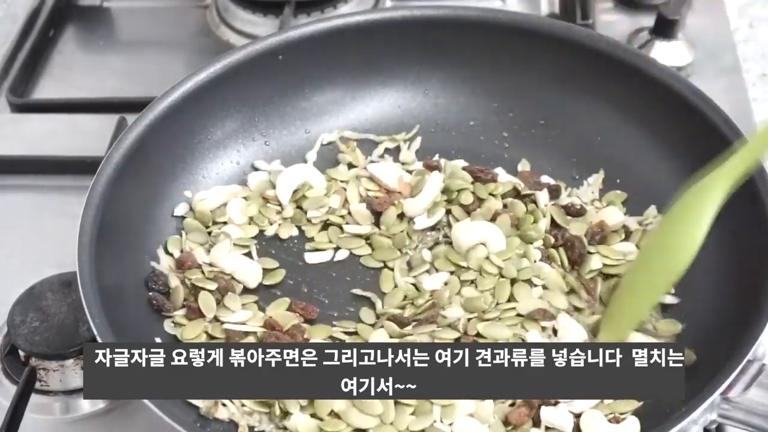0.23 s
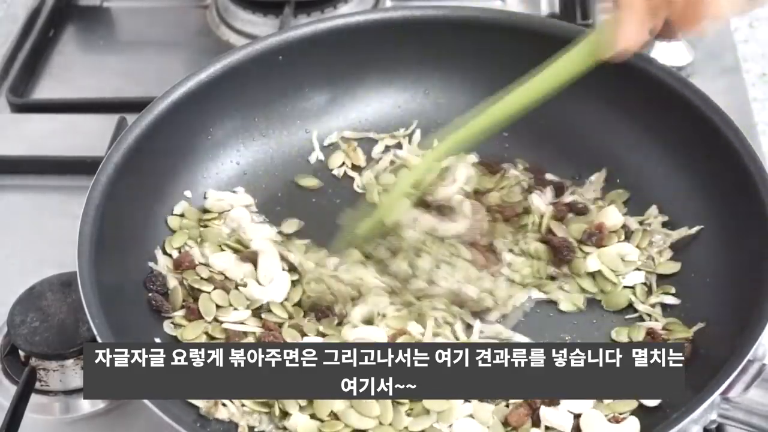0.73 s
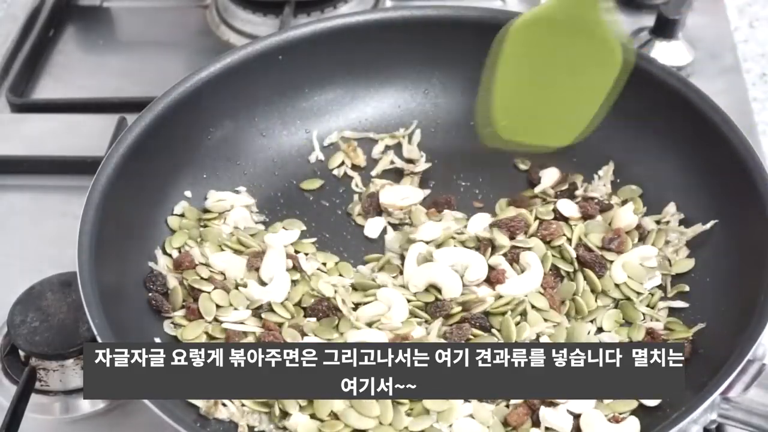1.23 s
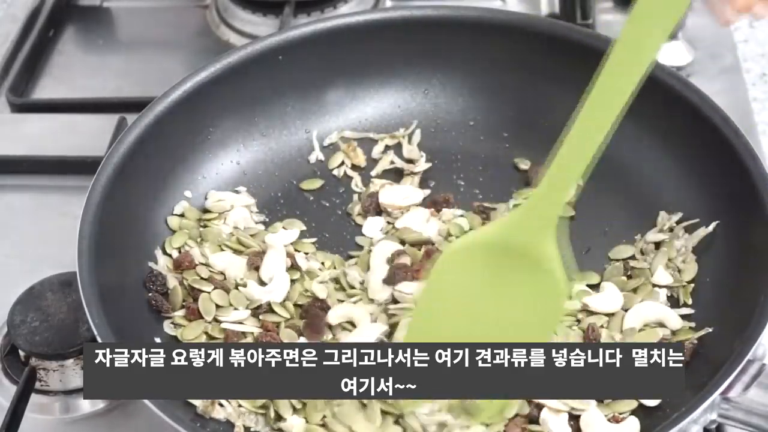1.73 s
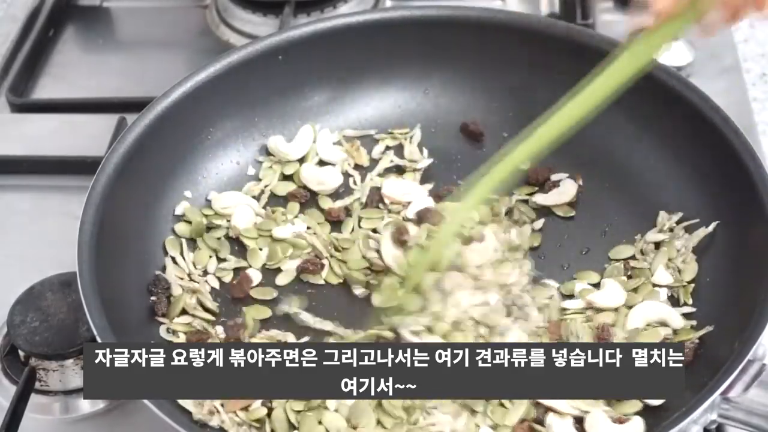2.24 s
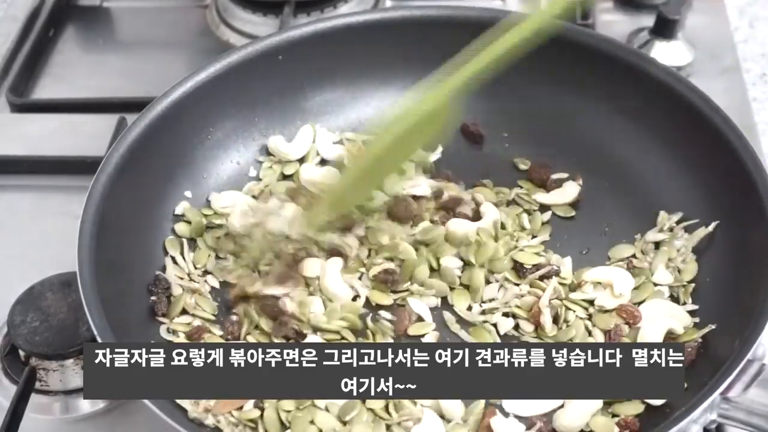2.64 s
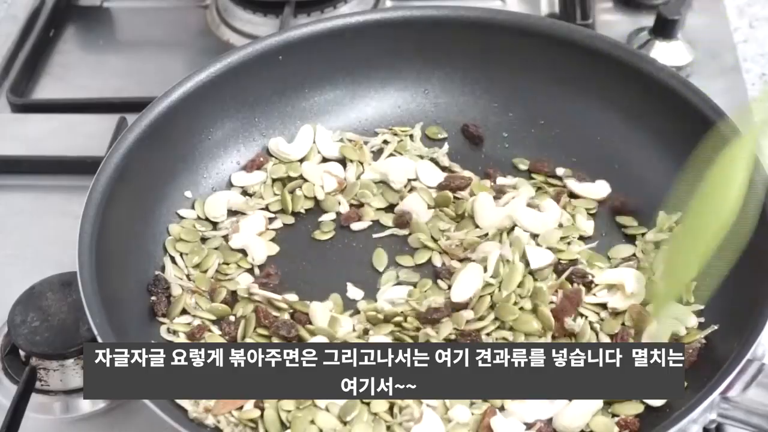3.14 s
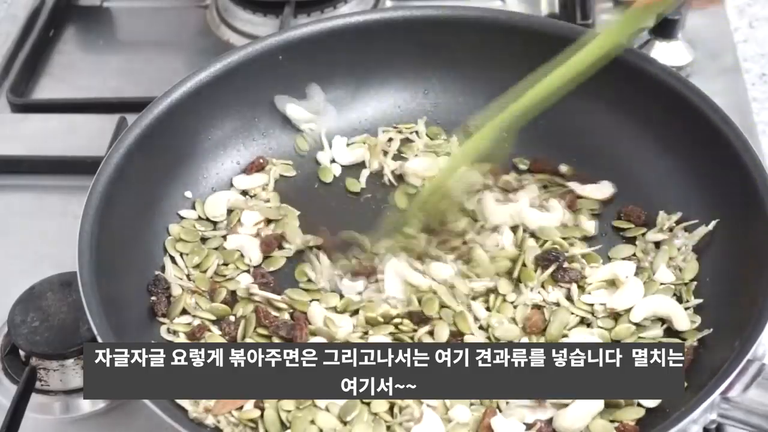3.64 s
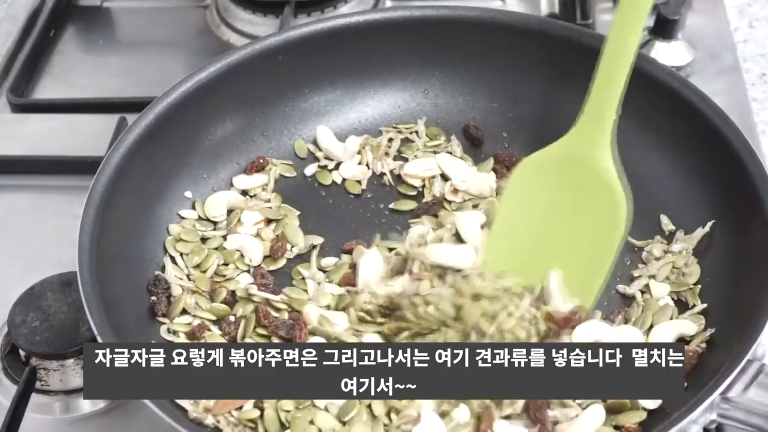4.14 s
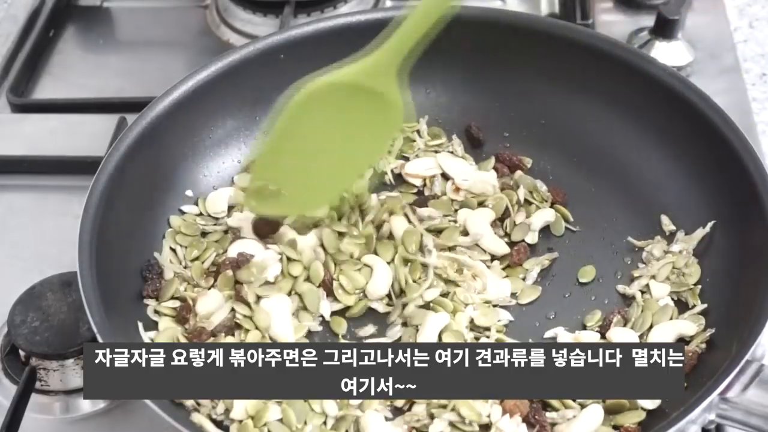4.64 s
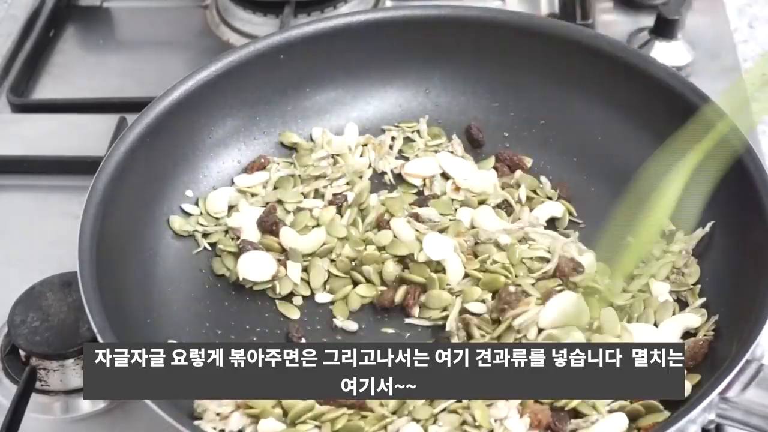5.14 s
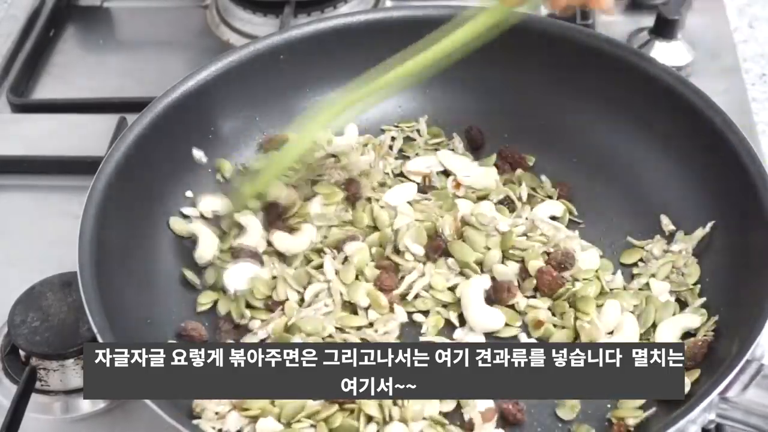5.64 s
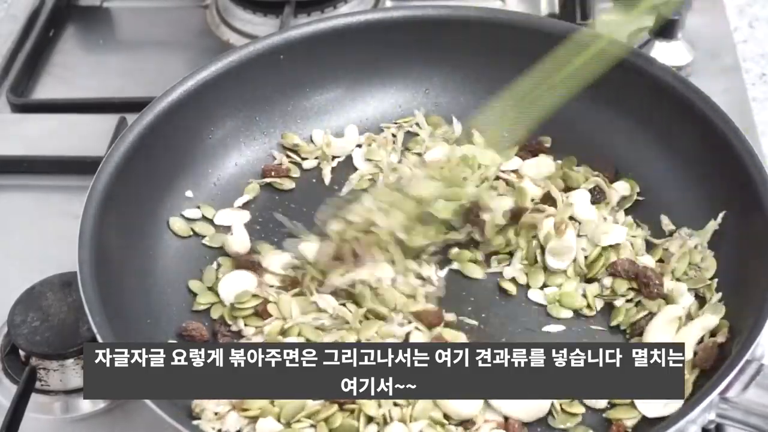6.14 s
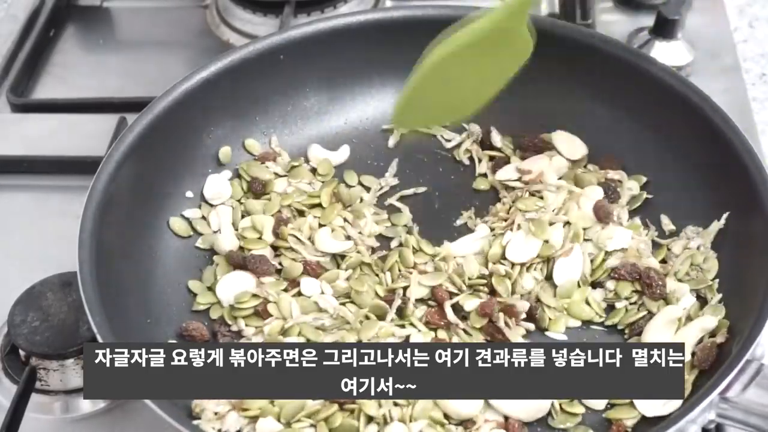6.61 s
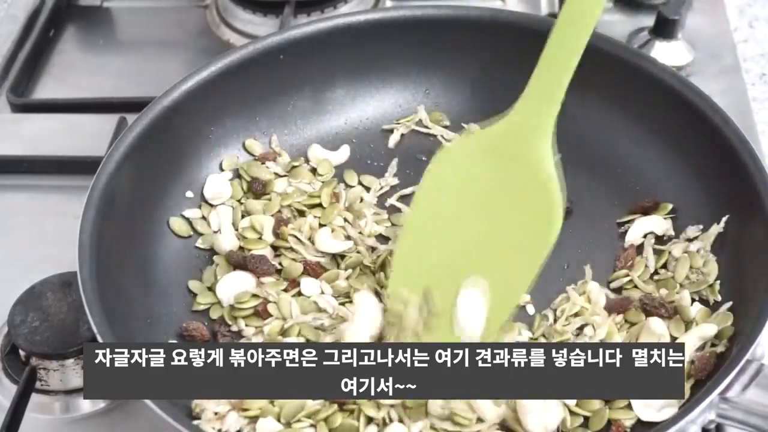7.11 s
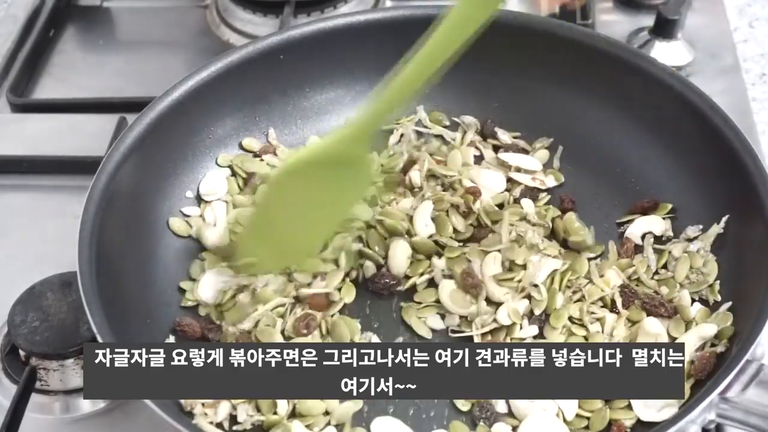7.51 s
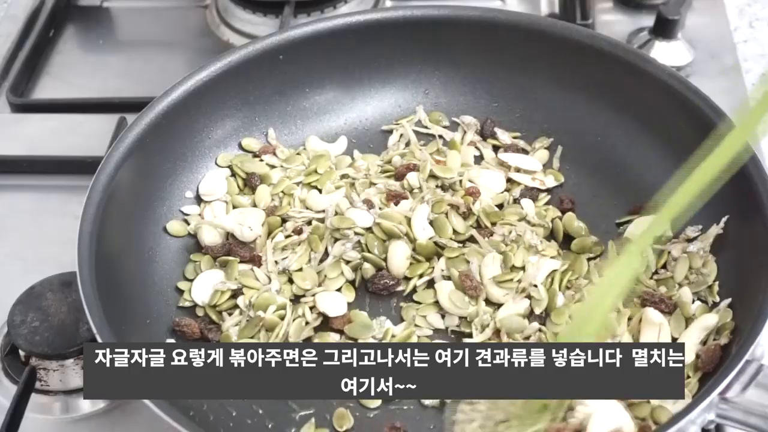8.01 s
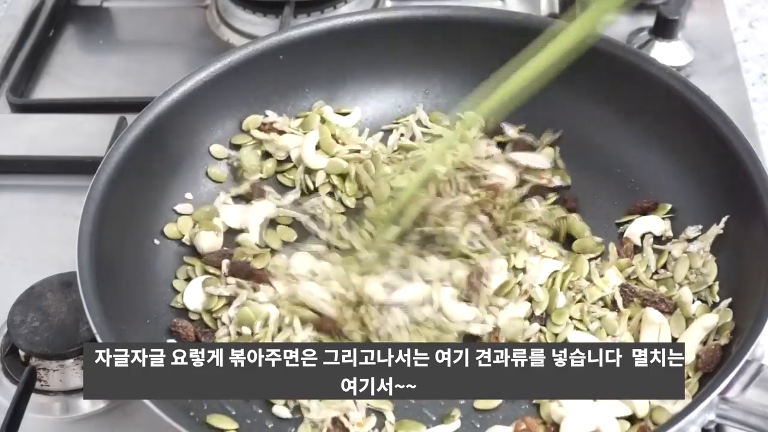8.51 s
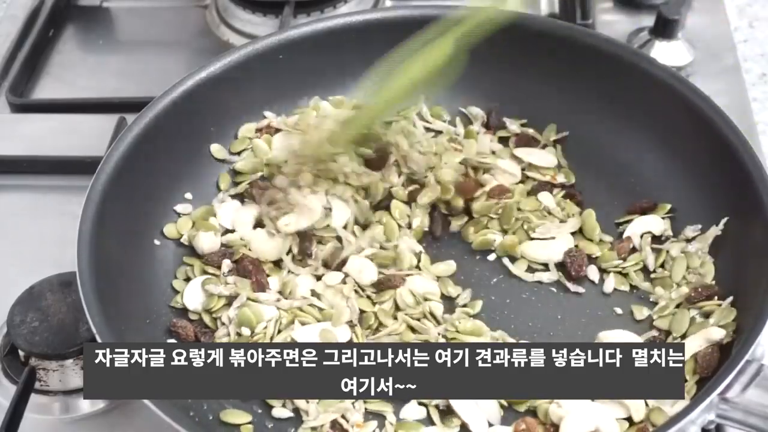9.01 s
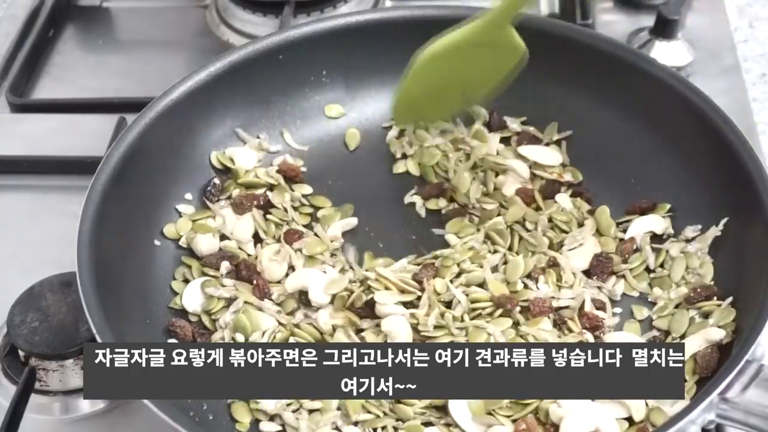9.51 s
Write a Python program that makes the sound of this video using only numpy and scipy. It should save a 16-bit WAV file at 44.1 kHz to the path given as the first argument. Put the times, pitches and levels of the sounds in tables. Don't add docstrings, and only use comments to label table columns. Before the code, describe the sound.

Grainy swishes come in quick uneven strokes as seeds and nuts are turned in a metal pan. They start dense and crackly, ease into lighter stirring, then grow more clattery after six seconds with stronger knocks and scrapes. Short chinks, dry snaps and oil pops scatter over quiet sizzle. Heard very close, with little room echo.

```python
import sys
import numpy as np
from scipy import signal
from scipy.fft import rfft, irfft, next_fast_len
from scipy.io import wavfile
from scipy.ndimage import uniform_filter1d

SR = 44100
rng = np.random.default_rng(int(sys.argv[2]) if len(sys.argv) > 2 else 0)


def boost(x):
    u = np.asarray(x, float) / 20
    return 10 ** u


def file_out(sig):
    cols = np.atleast_2d(sig).T
    lim = np.clip(cols, -1, 1)
    pcm = np.round(lim * 32767).astype(np.int16)
    wavfile.write(sys.argv[1], SR, pcm)


N = 430416


def rms_one(x):
    return x / np.sqrt(np.mean(x ** 2) + 1e-20)


def at_hz(points, hz):
    point_hz, point_db = np.array(points).T
    return np.interp(np.log(hz), np.log(point_hz), point_db)


def bandpass(x, order, low_hz, high_hz):
    return signal.sosfilt(signal.butter(order, [low_hz, high_hz], "band", fs=SR, output="sos"), x)


def lowpass(x, order, hz):
    return signal.sosfilt(signal.butter(order, hz, fs=SR, output="sos"), x)


def highpass(x, order, hz):
    return signal.sosfilt(signal.butter(order, hz, "high", fs=SR, output="sos"), x)


def drift(depth_db, rate_hz):
    r = np.exp(-80 * np.pi * rate_hz / SR)
    slow = signal.lfilter([1], [1, -2 * r, r * r], rng.standard_normal(N // 40 + 2002))[2000:]
    return np.repeat(boost(depth_db * rms_one(slow)), 40)[:N]


def ring(clicks, hz, t60_s, order=1):
    r, w = boost(-60 / (t60_s * SR)), 2 * np.pi * min(hz / SR, .45)
    resonator = [0, np.sin(w), 0, 1, -2 * r * np.cos(w), r * r]
    return signal.sosfilt([resonator] * order, clicks + 1e-18)


# f/Hz, side minus mid level/dB
WIDTH = [(60, -14), (150, -13), (380, -13), (950, -22), (2380, -7.5), (5980, -8.5), (9000, -5.5),
         (15000, -1)]


def stereo(mid, side, hz):
    return mid + boost(at_hz(WIDTH, hz)) * side * [[1], [-1]]


def grains(per_s, spread_db, clump_db):
    sizes = boost(spread_db * np.minimum(rng.exponential(1, N), 5)) * rng.choice([-1, 1], N)
    return sizes * (rng.random(N) < per_s * drift(clump_db, 25) / SR)


def hiss(spectrum, patchy_db):
    out, white = 0, rng.standard_normal((2, 2, N))
    edges = np.geomspace(spectrum[0][0], spectrum[-1][0], 11)
    for k, (low, high) in enumerate(zip(edges, edges[1:])):
        mid, side = bandpass(white[k % 2], 2, low, high)
        hz = np.sqrt(low * high)
        flicker = drift(patchy_db * min(1, 4000 / hz), 10.7)
        out = out + boost(at_hz(spectrum, hz)) * flicker * stereo(mid, side, hz)
    return rms_one(out)


def struck(modes, train, blows, offset_db, scatter_db, wander_db, above_db=0, below_db=5.9):
    s, peak_db, upper_db, contact_hz = np.array(blows).T
    at, luck = (s * SR).astype(int), rng.standard_normal((len(s), len(modes)))
    rub, hits, spots = 0, 0, rng.standard_normal(N)
    for k, (hz, level_db, t60_s) in enumerate(modes):
        rub = rub + boost(level_db) * drift(wander_db, 5) * ring(train * np.roll(spots, 997 * k), hz, t60_s)
        colour_db = upper_db + 6 if hz > 2400 else 0
        colour_db = colour_db - below_db * np.maximum(np.log2(contact_hz / hz), 0)
        colour_db = colour_db - above_db * np.maximum(np.log2(hz / contact_hz), 0)
        hit_db = peak_db + offset_db + level_db + colour_db + scatter_db * luck[:, k]
        clicks = np.zeros(N)
        clicks[at] = boost(hit_db) * np.sign(luck[:, k - 1])
        hits = hits + ring(clicks, hz, t60_s)
    return rms_one(rub), hits


def swells(moves, rest_db):
    t = np.arange(0, N, 40) / SR
    shapes = [np.interp(t, [s - rise_s, s, s + fall_s], [rest_db, db, rest_db])
              for s, db, rise_s, fall_s in moves]
    return np.interp(np.arange(N) / SR, t, np.max(shapes, axis=0))


# peak t/s, rustle level/dB, rattle level/dB, build/s, slide back/s
SWEEPS = [(.08, -28, -32.5, 0.31, 0.67), (.3, -26.5, -54, 0.31, 0.54), (.45, -31, -37, 0.8, 0.1),
          (.76, -36, -43.5, 0.065, 0.49), (1.095, -36.5, -43.5, 0.033, 0.32),
          (1.55, -38.5, -43, 0.15, 0.22), (2.06, -30.5, -42, 0.022, 0.17), (2.28, -36, -45, 0.53, 0.26),
          (2.68, -34.5, -43, 0.42, 0.37), (3.0, -37.5, -39.5, 0.36, 0.3), (3.72, -35, -40.5, 0.35, 0.2),
          (4.72, -44, -46, 0.83, 0.12), (5.05, -38, -43, 0.28, 0.4), (5.42, -38, -40.5, 0.22, 0.21),
          (5.83, -38.5, -35, 0.22, 0.21), (6.13, -39, -42, 0.22, 0.8), (6.28, -40.5, -40, 0.17, 0.21),
          (7.01, -53.5, -42.5, 0.19, 0.25), (7.47, -36, -36.5, 0.14, 0.25), (7.88, -33, -43, 0.15, 0.23),
          (8.21, -33, -38.5, 0.23, 0.21), (8.58, -43.5, -40, 0.27, 0.51), (9.02, -37, -40, 0.33, 0.35),
          (9.39, -34, -35.5, 0.19, 0.32)]
# peak t/s, rustle level/dB, rattle level/dB, half length/s
SPILLS = [(0.221, -26, -27, 0.06), (0.547, -29.5, -46, 0.094), (1.462, -37.5, -55, 0.17),
          (1.782, -36.5, -53, 0.12), (1.92, -38, -51.5, 0.12), (3.309, -36.5, -45.5, 0.16),
          (3.446, -30.5, -39.5, 0.1), (3.94, -39.5, -67, 0.12), (4.18, -38, -44.5, 0.11),
          (4.496, -37, -40, 0.03), (4.914, -39.5, -60, 0.098), (5.207, -37.5, -40, 0.041),
          (5.6, -41, -48, 0.37), (6.482, -40, -33, 0.25), (6.808, -34, -30, 0.027),
          (7.733, -49, -39, 0.051), (8.45, -42.5, -44, 0.2), (8.539, -30.5, -43.5, 0.1),
          (9.257, -34.5, -31.5, 0.056), (9.76, -39, -39.5, 0.18)]
# t/s, drag level/dB, dying away/s
LANDINGS = [(0.0, -30, 0.066), (.22, -30.5, 0.2), (0.75, -31.5, 0.08), (1.42, -37, 0.1), (2.24, -38, 0.1),
            (2.54, -46.5, 0.13), (2.92, -32.5, 0.13), (3.27, -41, 0.12), (3.64, -39, 0.21),
            (4.02, -39, 0.058), (4.52, -42, 0.24), (4.892, -34, 0.15), (5.33, -46.5, 0.33),
            (5.73, -33.5, 0.099), (6.08, -42, 0.21), (6.449, -23.5, 0.19), (6.81, -26.5, 0.18),
            (7.37, -35.5, 0.1), (7.713, -31.5, 0.22), (8.1, -44.5, 0.25), (8.48, -30.5, 0.14),
            (8.89, -32.5, 0.15), (9.257, -27.5, 0.26), (9.631, -26.5, 0.15)]


def stirring():
    heap = list(SWEEPS) + [(s, a, b, half_s, half_s) for s, a, b, half_s in SPILLS]
    lands = [(s, db, 0.054, fall_s) for s, db, fall_s in LANDINGS]
    shaken = [(s, db - 9.5, rise_s, fall_s) for s, db, rise_s, fall_s in lands]
    rustle_db = swells([(s, db, up, down) for s, db, _, up, down in heap], -53)
    rattle_db = swells([(s, db, up, down) for s, _, db, up, down in heap] + shaken, -62)
    return rustle_db, rattle_db, swells(lands, -58)


# f/Hz, level/dB per Hz
RUSTLE = [(1180, -19), (2000, -29), (2310, 0.5), (2560, 6), (2660, -8.5), (5900, 2), (8580, -1.5),
          (12500, -29), (16200, -9), (22000, -120)]


def crackle(clicks):
    count, cycles = 12, 5.5
    out, dealt, spot = 0, rng.integers(0, count, N), rng.standard_normal(N)
    for k, hz in enumerate(np.geomspace(RUSTLE[0][0], RUSTLE[-1][0], count)):
        mine = clicks * (dealt == k) * drift(1.0, 4.8)
        mid, side = ring(np.array([mine, mine * spot]), hz, cycles / hz, order=2)
        gain = boost(at_hz(RUSTLE, hz)) * np.sqrt(hz) / np.sqrt(np.mean(mid ** 2))
        out = out + gain * stereo(mid, side, hz)
    return rms_one(out)


def clacks(busy):
    hits = np.abs(grains(200 * busy, 3.8, 3.0)) + 1e-18
    burst = signal.lfilter([1], [1, -boost(-60 / (0.014 * SR))], hits)
    mid, side = bandpass(burst * rng.standard_normal((2, N)), 2, 1900, 7500)
    return rms_one(stereo(mid, side, 6000))


def heap_rustle(rustle_db):
    busy = boost(0.55 * (rustle_db - np.mean(rustle_db)))
    fine = crackle(grains(3000 * busy, 2.5, 3.0) / np.sqrt(busy))
    return boost(rustle_db - 2.2) * fine + boost(rustle_db - 6.5) * clacks(busy)


# t/s, peak level/dB, contact f/Hz
NUTS = [(0.323, -27, 1900), (0.741, -20, 1230), (1.097, -24.5, 2600), (1.404, -25, 1630),
        (2.0205, -15.5, 1850), (2.058, -17.5, 1860), (2.478, -33, 1930), (2.508, -33, 2270),
        (3.418, -31, 1310), (3.43, -17, 2000), (3.913, -22, 1960), (4, -23, 1720), (4.174, -28, 2120),
        (4.222, -30, 990), (4.893, -26, 1710), (5.177, -29.5, 2260), (5.55, -29.5, 770), (6.438, -12, 980),
        (6.798, -15, 1040), (7.13, -27, 970), (7.227, -22, 1100), (7.267, -21, 1160), (7.855, -27, 2410),
        (9.25, -15, 1000), (9.354, -26.5, 990), (9.41, -22, 1900), (9.591, -29, 1960), (9.622, -15.5, 1070)]
# t/s, peak level/dB, contact f/Hz
TAPS = [(0.167, -11, 1290), (0.202, -12, 1320), (2.019, -15.5, 1390), (2.042, -19.5, 1290),
        (2.081, -21.5, 1910), (2.893, -29, 1760), (2.916, -25, 1030), (3.592, -26.5, 1030),
        (3.714, -25.5, 1340), (4.871, -32, 1740), (5.689, -31, 1140), (6.384, -29, 1230),
        (6.417, -17.5, 960), (6.777, -28, 940), (7.012, -28, 1110), (7.204, -28.5, 905),
        (7.703, -20.5, 1130), (7.766, -28, 1700), (8.394, -28, 1120), (8.461, -19.5, 975),
        (8.663, -27.5, 2280), (8.723, -25.5, 1120), (8.888, -23, 860), (9.019, -20.5, 1090),
        (9.192, -33, 1110), (9.229, -20.5, 980), (9.286, -19, 860), (9.54, -29.5, 1160), (9.602, -24, 940)]


def all_knocks():
    return [(s, db, -2.5, hz) for s, db, hz in NUTS] + [(s, db, -36, hz) for s, db, hz in TAPS]


def contacts(knocks):
    out, t = np.zeros(N + SR), np.arange(SR // 6) / SR
    for s, peak_db, _, hz in knocks:
        thock = boost(-60 * t / 0.026) * np.sin(2 * np.pi * hz * t)
        clatter = boost(0.5 - 60 * t / 0.086) * bandpass(rng.standard_normal(len(t)), 2, 0.62 * hz, 1.8 * hz)
        at = int(s * SR)
        out[at:at + len(t)] += boost(peak_db) * (thock + clatter)
    return out[:N]


# f/Hz, level/dB, t60/s
PAN_MODES = [(634, -10.5, 0.08), (741, 2.5, 0.033), (860, 1, 0.052), (971, 4.5, 0.026), (1117, 4, 0.042),
             (1230, -7, 0.082), (1311, 4.5, 0.039), (1420, -13, 0.12), (1701, -7.5, 0.055),
             (1912, 0, 0.048), (1990, 4.5, 0.015), (2280, 1, 0.038), (2480, -4.5, 0.041),
             (2842, -1.5, 0.031), (3120, 3, 0.018), (3370, -5, 0.041), (3980, 7.5, 0.0063)]


def pan_floor(rattle_db):
    knocks = all_knocks()
    rattle, hits = struck(PAN_MODES, grains(1500, 3.16, 3.0), knocks,
                          offset_db=-17.5, scatter_db=3.5, wander_db=0.5)
    return highpass(boost(rattle_db + 3.5) * rattle + hits + contacts(knocks), 3, 540)


# t/s, peak level/dB, loudest f/Hz
THUDS = [(0.2, -22.5, 304), (.714, -27.5, 140), (.748, -33, 280), (1.403, -28, 320), (2.891, -30, 328),
         (3.258, -35, 218), (3.585, -25.5, 168), (3.63, -32, 172), (4.002, -26, 294), (4.492, -36.5, 180),
         (4.889, -26, 171), (5.712, -35, 172), (6.419, -23, 172), (6.436, -24, 168), (6.794, -21.5, 270),
         (7.337, -41, 334), (7.695, -29.5, 170), (8.464, -24, 345), (8.89, -29, 200), (9.23, -24, 269),
         (9.619, -31, 207)]
# f/Hz, level/dB, t60/s
BOWL_MODES = [(91, -10, 0.26), (168, -1.5, 0.11), (206, -1, 0.062), (278, -4.5, 0.088), (334, -9, 0.16),
              (511, -0.5, 0.06)]


def pan_body(drag_db):
    drag, thuds = struck(BOWL_MODES, grains(900, 1.9, 1.5), [(s, db, 0, hz) for s, db, hz in THUDS],
                         offset_db=-2.5, scatter_db=3.0, wander_db=3.0, above_db=8.0, below_db=10.5)
    return boost(drag_db - 5.0) * drag + lowpass(thuds, 2, 650)


# t/s, peak level/dB, brightness/dB
OIL_POPS = [(0.21, -20, -6), (0.278, -10, 6), (0.325, -22, -17), (0.3374, -5.5, -3), (0.7555, -25, -20),
            (0.8316, -12.5, -1.5), (1.798, -16, 0.5), (2.0547, -15, -19), (2.069, -16, 1), (2.4675, -27, 2),
            (2.7821, -16, 7.5), (3.6462, -17.5, -5), (4.041, -17.5, 3.5), (4.2289, -21, 12),
            (4.5213, -21.5, 7), (5.1852, -31, 14), (6.119, -29, 9), (6.317, -17, -6), (6.6702, -15.5, 1),
            (7.007, -24.5, 8.5), (7.072, -23, 7), (8.11, -25, 6), (8.508, -16, -1.5), (9.1477, -18, 1),
            (9.5116, -14, 1.5), (9.552, -18, 5)]
# t/s, peak level/dB
SNAPS = [(.1196, -14.5), (0.136, -12.5), (0.19, -13), (0.356, -12), (0.4012, -12), (0.43, -17),
         (0.4354, -26), (0.773, -17), (0.904, -22.5), (1.4458, -18.5), (1.8968, -20), (2.043, -20.5),
         (2.5088, -19), (2.767, -19), (3.432, -16.5), (3.689, -17), (4.1582, -27), (5.203, -19),
         (6.402, -21), (6.4354, -16.5), (6.6168, -16.5), (6.795, -17.5), (7.672, -21), (7.886, -20),
         (7.9572, -21), (8.6623, -23), (8.9908, -19), (9.0243, -17.5), (9.3768, -14), (9.623, -15.5)]
SPITS = [0.072, 0.73, 0.82, 1.128, 1.3073, 1.484, 3.1258, 3.297, 3.3144, 6, 4.4193, 5.9, 4.8322, 5.113,
         5.242, 5.5, 4.357, 9.042, 9.336, 9.487, 8.657, 8.8473, 9.2364]


def all_pops():
    oil_spray_db = -35.5
    oil = [(s, db, bright_db, oil_spray_db) for s, db, bright_db in OIL_POPS]
    dry_snaps = [(s, db, -28, -27.5) for s, db in SNAPS]
    spits = [(s, -31.5, 10, oil_spray_db) for s in SPITS]
    strays = [(a * (N / SR - .01), -38 + 13 * b ** 2, -22 * c, oil_spray_db)
              for a, b, c in rng.random((220, 3))]
    return oil + dry_snaps + spits + strays


def pops():
    s, peak_db, bright_db, spray_db = np.transpose(all_pops())
    at, dull, bright = ((s + .0008) * SR).astype(int), 0, 0
    luck = rng.standard_normal((len(s), 6))
    pan_pos = luck[:, -1]
    place = boost(np.outer([1, -1], 0.45 * pan_pos))
    late = np.array([pan_pos < -.9, pan_pos > .9]) * (peak_db < -17.5)
    where = ([[0], [1]], at + late)
    fizz = rng.standard_normal(N) + 0.16 * rng.standard_normal((2, N))
    fade = boost(-60 / (.055 * SR))
    bands = [(3000, -44.0), (4800, 2.5), (6800, 6.5), (10500, 5.5), (14600, 2.0)]  # f/Hz, level/dB
    for k, (hz, level_db) in enumerate(bands):
        top = hz > 9000
        clicks, splash = np.zeros((2, 2, N))
        clicks[where] = place * boost(peak_db + level_db + (bright_db if top else 0) + 2.7 * luck[:, k])
        splash[:, at] = clicks[where] * boost(spray_db)
        spray = signal.lfilter([1], [1, -fade], splash) * fizz
        snap = ring(clicks * (-1) ** k + spray, hz, 7.6 / hz)
        if top:
            bright = bright + snap
        else:
            dull = dull + snap
    out = bright + lowpass(dull, 6, 10500)
    wall = [(.0013, -13), (.0021, -15), (.0046, -15)]  # lag/s, level/dB
    return out + sum(boost(db) * np.roll(out, int(lag_s * SR), axis=1) for lag_s, db in wall)


# t/s, peak level/dB, f/Hz
CHINKS = [(0.535, -21, 3020), (0.8984, -32, 3320), (0.9472, -24.5, 3380), (1.036, -32, 3470),
          (1.1265, -21, 2020), (1.278, -34, 1900), (2.0195, -24.5, 1920), (2.114, -17.5, 1880),
          (2.2058, -19, 2970), (2.2513, -24, 3080), (2.332, -21.5, 2430), (2.364, -26, 2280),
          (2.6738, -20, 3130), (2.76, -25, 2280), (2.9442, -20.5, 1900), (3.0665, -27, 1900),
          (3.1486, -23.5, 3140), (3.5299, -28, 2030), (3.714, -28, 2330), (4.4767, -42, 3520),
          (4.4947, -30, 3730), (4.714, -27, 2920), (5.1998, -21.5, 3270), (5.222, -23.5, 3230),
          (5.492, -25, 2540), (5.5938, -22, 3080), (5.6331, -29, 3110), (5.69, -27, 1990),
          (5.788, -26, 3250), (6.1639, -25, 2320), (6.315, -25, 3300), (6.4337, -15.5, 3600),
          (6.493, -27, 3160), (6.795, -19.5, 3340), (7.0104, -22.5, 2000), (7.058, -28.5, 3050),
          (7.3198, -29, 3600), (7.419, -31, 3780), (7.433, -25, 3320), (7.516, -27, 2040),
          (7.5692, -21.5, 2320), (7.733, -22, 1750), (7.8525, -22, 3110), (7.8868, -17.5, 2280),
          (7.9987, -25, 2280), (8.109, -28, 3010), (8.1968, -26, 2300), (8.3174, -25.5, 2270),
          (8.4245, -21.5, 1990), (8.5647, -17, 1970), (8.5967, -20.5, 1890), (8.675, -19, 2310),
          (8.786, -34, 3070), (8.9955, -27, 1930), (9.0987, -43, 2290), (9.2843, -29, 2300),
          (9.353, -19.5, 3080), (9.3768, -24, 1920), (9.4449, -20, 2310), (9.5287, -41, 1990)]
# t/s, peak level/dB
TICKS = [(0.0447, -20), (0.515, -27), (0.565, -14), (0.613, -18), (0.9476, -14), (1.0869, -15),
         (1.4197, -21), (1.523, -19), (1.733, -22), (1.8861, -20), (1.934, -17), (2.1136, -20),
         (2.154, -39), (2.187, -19), (2.3261, -31), (2.364, -29), (2.695, -18), (2.799, -14), (2.816, -17),
         (2.87, -22), (3.152, -20), (3.5294, -24), (3.78, -19.5), (3.876, -19), (4.1006, -39), (4.126, -33),
         (4.1734, -32), (4.193, -16), (4.3954, -42), (4.4924, -21), (4.7136, -29), (4.877, -19),
         (5.292, -17.5), (5.439, -20), (5.555, -19), (5.578, -16), (5.592, -27), (5.608, -17),
         (5.6341, -18), (5.659, -29), (5.7119, -20), (5.8331, -19), (5.894, -25), (6.0816, -22),
         (6.2397, -28), (6.2613, -18), (6.4946, -26), (6.8675, -18), (7.2675, -23), (7.4814, -30),
         (7.5373, -38), (7.773, -21), (7.9984, -22), (8.33, -16.5), (8.8243, -23), (9.1062, -17),
         (9.2515, -21), (9.3521, -27), (9.4449, -35), (9.468, -16.5)]


def seeds():
    out, t = np.zeros((2, N + SR)), np.arange(SR // 10) / SR
    for s, peak_db, hz in CHINKS:
        noise = bandpass(rng.standard_normal((2, len(t))), 1, hz / 2, 2 * hz)
        tone = rms_one(ring(noise[0, ::-1], hz, 0.017))
        chink = boost(-10.5) * tone + boost(-4.5) * stereo(*noise, hz)
        at = int(s * SR)
        out[:, at:at + len(t)] += boost(peak_db - 60 * t / .055) * chink
    for s, peak_db in TICKS:
        fading = boost(peak_db - 5.5 - 60 * t / .015) * rng.standard_normal((2, len(t)))
        at = int(s * SR)
        out[:, at:at + len(t)] += stereo(*bandpass(fading, 3, 3300, 9800), 6000)
    return out[:, :N]


# middle t/s, half length/s, f/Hz, level/dB
SLIDES = [(0.449, 0.036, 930, -40), (2.045, 0.021, 1310, -43), (2.082, 0.02, 1920, -35),
          (3.457, 0.035, 2630, -35.5), (3.479, 0.061, 1970, -48), (5.864, 0.066, 1070, -40),
          (6.076, 0.028, 734, -42), (6.193, 0.047, 880, -42), (6.258, .06, 1130, -40.5),
          (6.447, 0.038, 1680, -33), (6.455, 0.032, 2400, -42), (6.457, 0.037, 860, -30),
          (6.541, 0.027, 1080, -36.5), (6.832, 0.064, 1630, -40), (8.24, 0.076, 2320, -41.5),
          (8.42, 0.035, 1210, -40), (8.491, 0.05, 946, -41), (8.618, 0.06, 770, -40.5),
          (8.686, 0.04, 780, -38), (8.949, 0.071, 954, -40), (8.957, 0.067, 1330, -46),
          (9.256, 0.029, 1760, -41), (9.271, 0.041, 775, -45), (9.387, .04, 3050, -45),
          (9.636, .04, 1770, -38)]


def slides():
    out = np.zeros(N + 2 * SR)
    for s, half_s, hz, db in SLIDES:
        noise = rng.standard_normal(SR // 3)
        grit = noise * (np.abs(noise) > 1.6) * np.abs(noise) ** 2
        size = int(2 * min(half_s, .16) * SR)
        at = int((s - half_s + 1) * SR)
        out[at:at + size] += boost(db) * np.hanning(size) * rms_one(ring(grit, hz, 0.035))[-size:]
    return out[SR:SR + N]


# f/Hz, level/dB
SIZZLE = [(290, -37), (500, -21), (828, 13), (1310, -17), (1560, -10), (1930, -51), (2690, -3),
          (6300, 12.5), (9030, 7), (15600, -3.5)]


def sizzle():
    steam = boost(-44.0) * hiss(SIZZLE, patchy_db=5.0)
    flare_end_s, flare_fall_s = 0.455, 0.034
    flare = np.interp(np.arange(N) / SR, [flare_end_s, flare_end_s + flare_fall_s], [boost(12.5), 0])
    return steam + flare * highpass(steam, 2, 8500)


# f/Hz, level/dB
FLAME = [(15, -36), (25, -8), (43, 22.5), (64, 14), (79, 6.5), (108, -25), (177, -34), (419, -54.5),
         (505, -47), (600, 16), (780, -18), (1320, -120)]
# t/s, level/dB
RUMBLE = [(0.0, -26.5), (0.16, -47.5), (2.01, -51.5), (3.04, -44.5), (3.51, -59.5), (3.59, -41),
          (3.91, -51), (7.01, -44), (7.07, -50), (8.83, -43.5), (8.89, -38.5), (9.76, -50)]


def flame():
    s, db = np.transpose(RUMBLE)
    rumble_db = np.interp(np.arange(N) / SR, s, db)
    return boost(-61.5 + 1.16 * (rumble_db + 54.0)) * hiss(FLAME, patchy_db=1.5)


def kitchen(x):
    t60_s, wall_cut_hz = 0.11, 21000
    size = next_fast_len(N + SR // 2)
    w = 2 * np.pi * np.arange(size // 2 + 1) / size
    dull = 1 / (1 + 1j * w * SR / (2 * np.pi * wall_cut_hz))
    out = np.zeros((2, len(w)), complex)
    for k, lag in enumerate((rng.uniform(0.0065, 0.12, 8) * SR).astype(int)):
        loop = boost(-60 * lag / SR / t60_s) * dull * np.exp(-1j * w * lag)
        out[k % 2] += loop / (1 - loop) * (-1) ** (k // 2)
    return irfft(out * rfft(x, size), size)[:, :N]


def scene():
    rustle_db, rattle_db, drag_db = stirring()
    rustle = heap_rustle(rustle_db)
    pan = pan_floor(rattle_db) + pan_body(drag_db)
    snaps = pops() + seeds() + slides()
    room = boost(-12) * kitchen((rustle + pan + snaps).mean(axis=0))
    wide_pan = pan + boost(-25.5) * (np.roll(pan, 31) - np.roll(pan, 140)) * [[1], [-1]]
    return rustle + wide_pan + snaps + sizzle() + room + flame()


# low f/Hz, high f/Hz
SURE_WIDE_HZ = [(0, 600), (3300, 7600)]


def thinned_width(x):
    mid, side = (x[0] + x[1]) / 2, (x[0] - x[1]) / 2
    hz, _, cells = signal.stft(side, SR, nperseg=2048, noverlap=1024)
    band = (hz / 620).astype(int)
    loud_db = 10 * np.log10(np.mean(np.abs(cells[hz > 4000]) ** 2, axis=0) + 1e-20)
    luck = rng.standard_normal((band[-1] + 2, cells.shape[1]))
    luck = uniform_filter1d(luck, size=3, axis=1) * np.sqrt(3)
    together = 1.1 * luck[-1]
    odds = -.55 + .15 * (loud_db - np.median(loud_db)) + together + .7 * luck[band]
    sure = np.any([(hz >= low) & (hz < high) for low, high in SURE_WIDE_HZ], axis=0)
    kept = (odds + .4 * (hz[:, None] < 3300) > 0) | sure[:, None]
    side = signal.istft(cells * kept, SR, nperseg=2048, noverlap=1024)[1][:N]
    return np.array([mid + side, mid - side])


def band_limit(x):
    return signal.sosfilt(signal.butter(12, 16980, fs=SR, output="sos"), x)


def record(dry):
    top_hz = 15900
    heard = highpass(dry, 3, 37)
    heard = 1.3 * np.tanh(heard / 1.3)
    top = signal.sosfilt(signal.ellip(6, .3, 40, top_hz, "high", fs=SR, output="sos"), heard)
    sharp = uniform_filter1d(np.abs(top).mean(axis=0), size=130) > boost(-43)
    below = signal.sosfilt(signal.ellip(8, .3, 26, top_hz, fs=SR, output="sos"), heard)
    mix = thinned_width(below + top * uniform_filter1d(sharp * 1., size=90))
    return band_limit(mix)


dry = scene()
out = record(dry)
file_out(out)
```